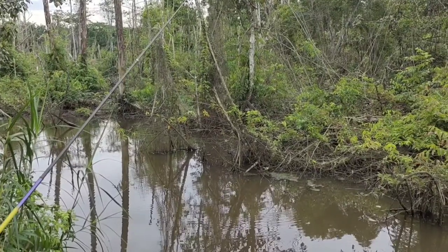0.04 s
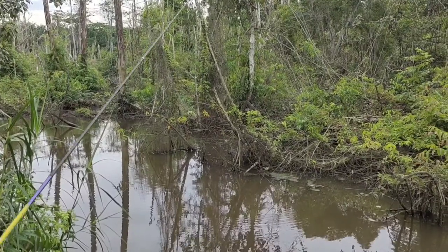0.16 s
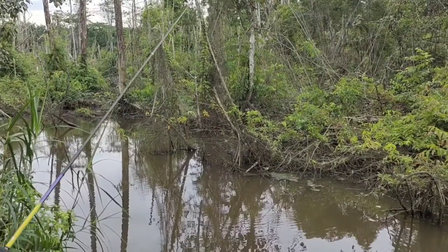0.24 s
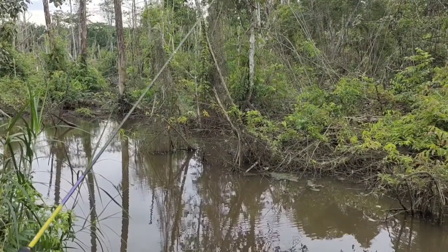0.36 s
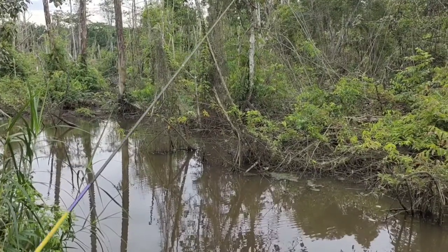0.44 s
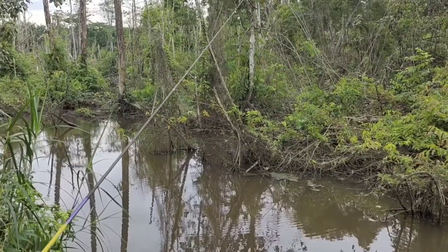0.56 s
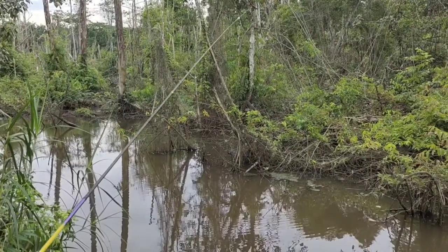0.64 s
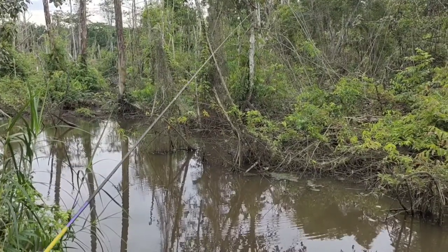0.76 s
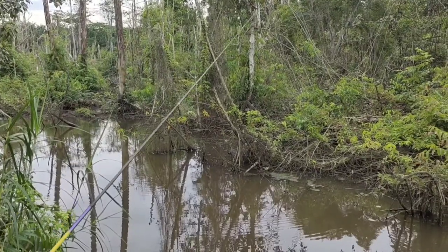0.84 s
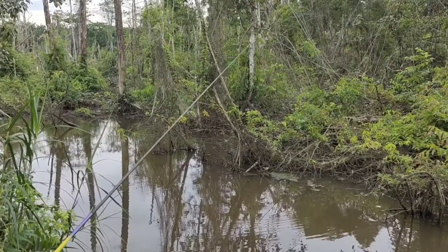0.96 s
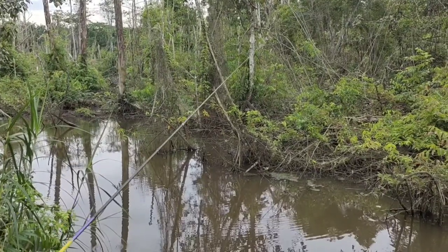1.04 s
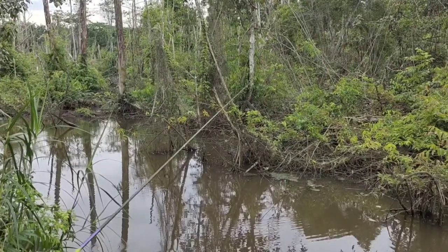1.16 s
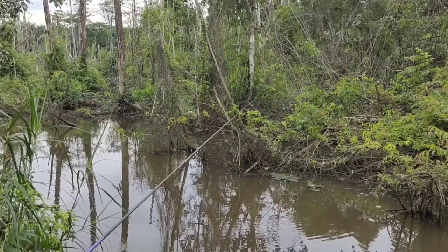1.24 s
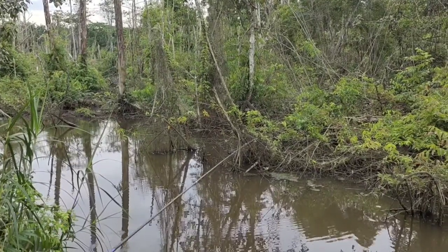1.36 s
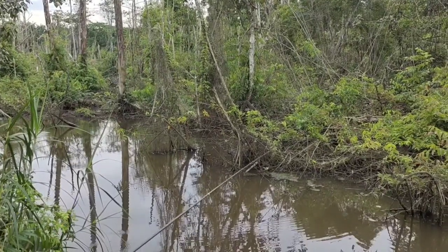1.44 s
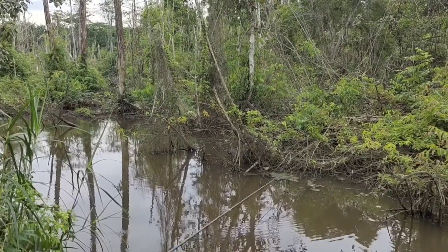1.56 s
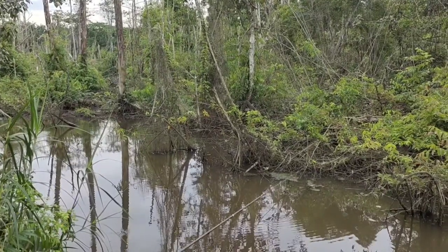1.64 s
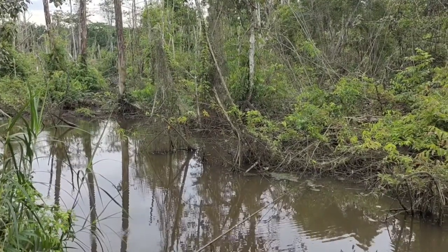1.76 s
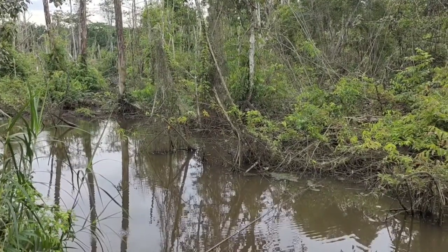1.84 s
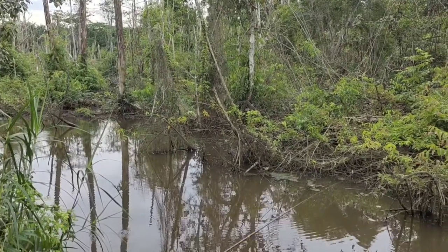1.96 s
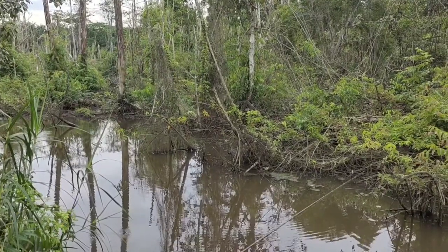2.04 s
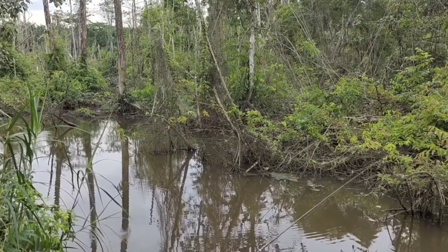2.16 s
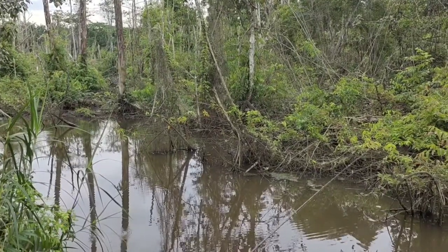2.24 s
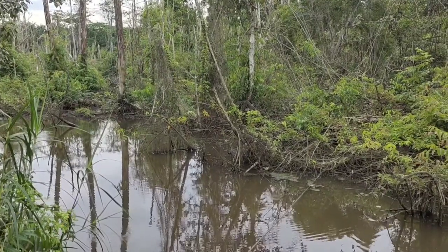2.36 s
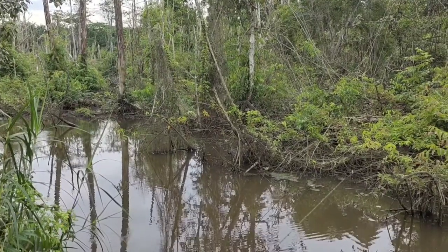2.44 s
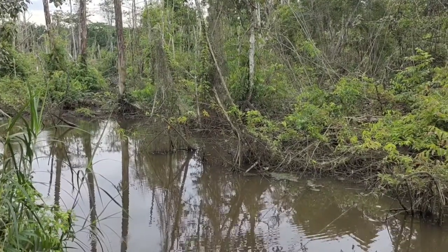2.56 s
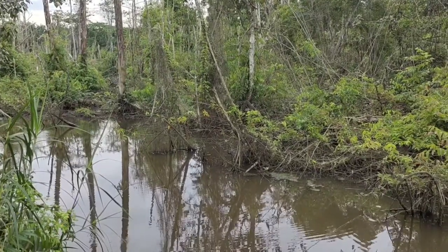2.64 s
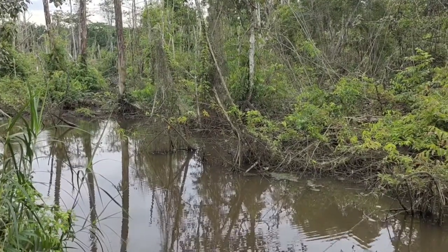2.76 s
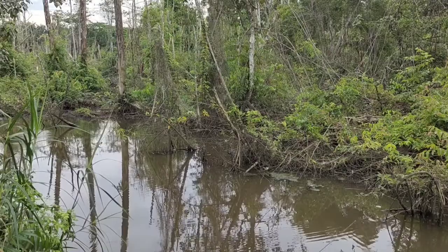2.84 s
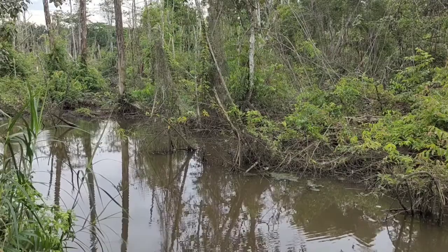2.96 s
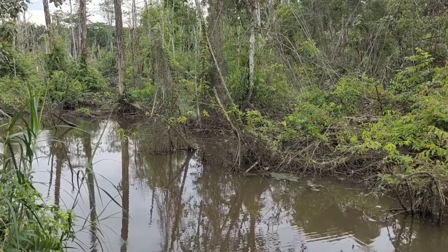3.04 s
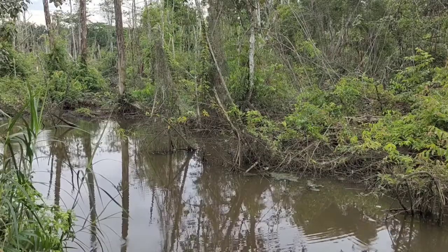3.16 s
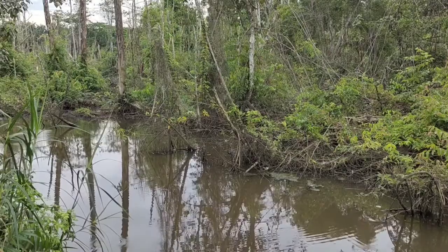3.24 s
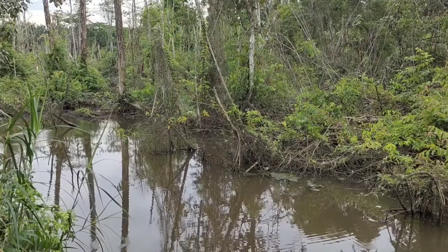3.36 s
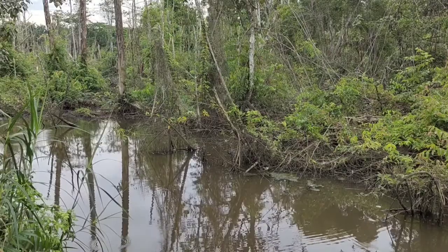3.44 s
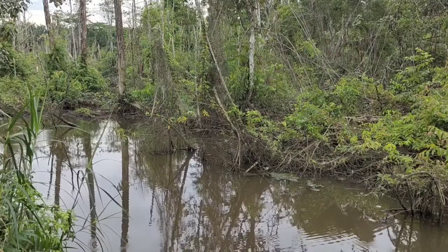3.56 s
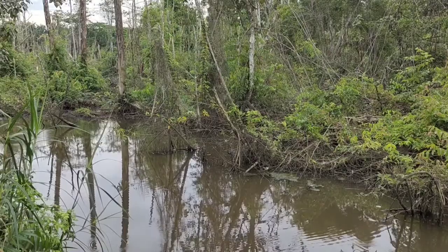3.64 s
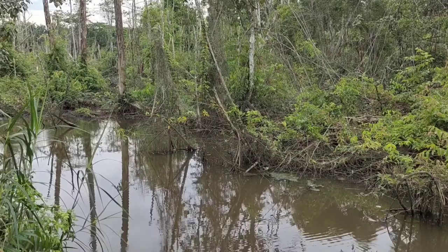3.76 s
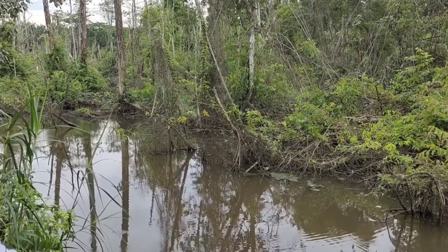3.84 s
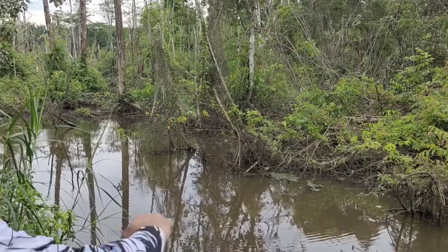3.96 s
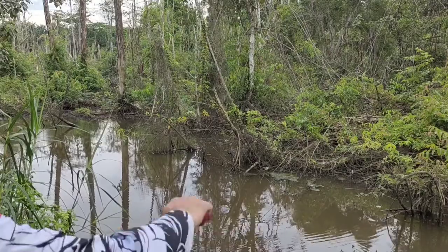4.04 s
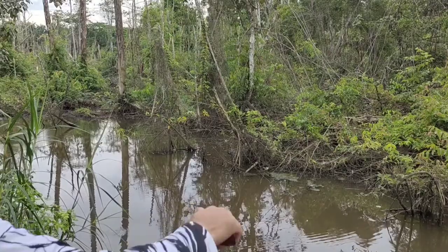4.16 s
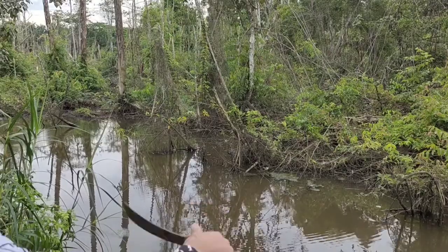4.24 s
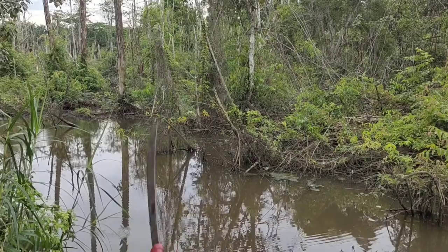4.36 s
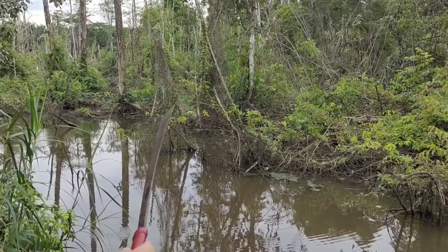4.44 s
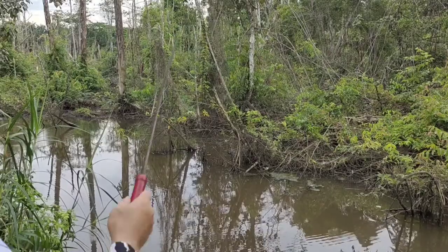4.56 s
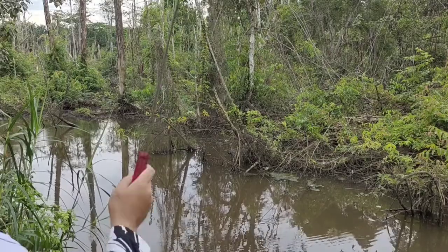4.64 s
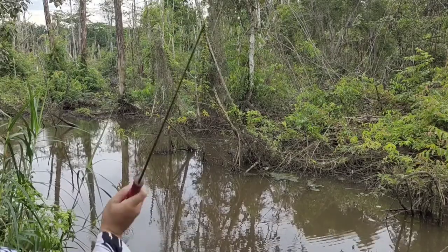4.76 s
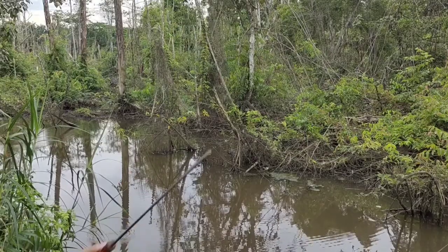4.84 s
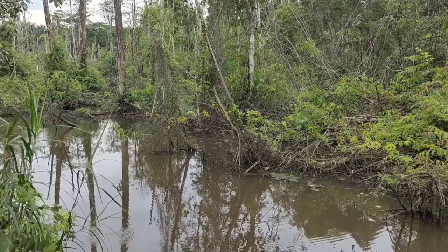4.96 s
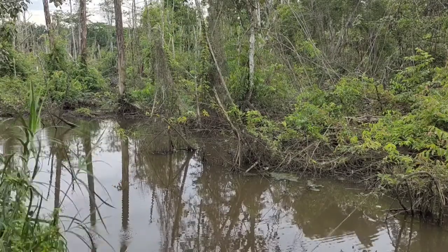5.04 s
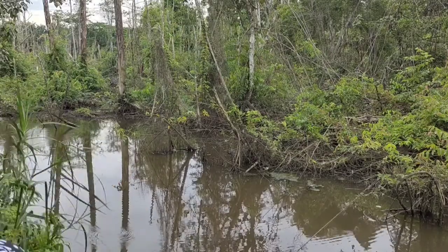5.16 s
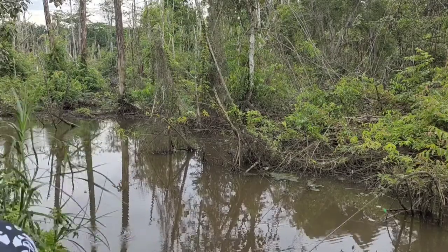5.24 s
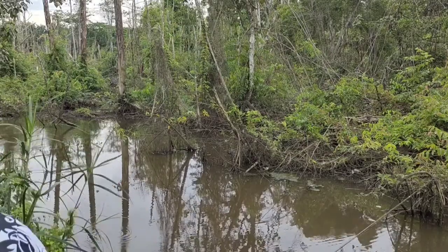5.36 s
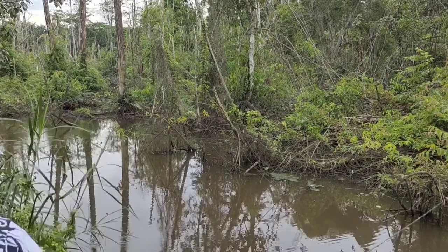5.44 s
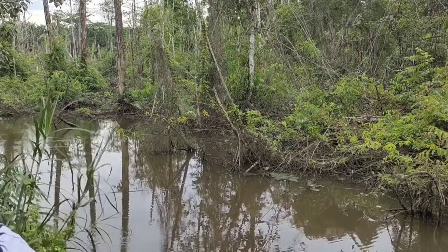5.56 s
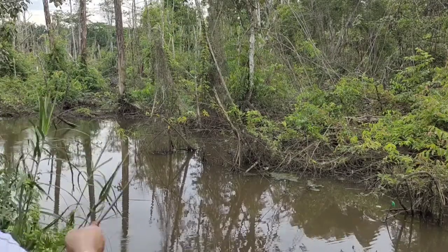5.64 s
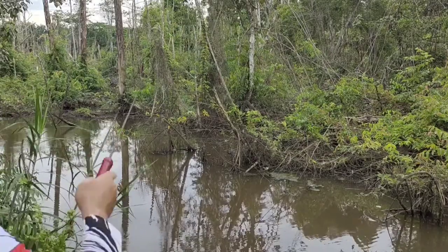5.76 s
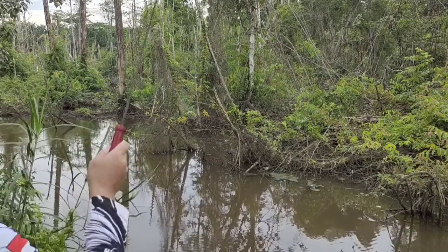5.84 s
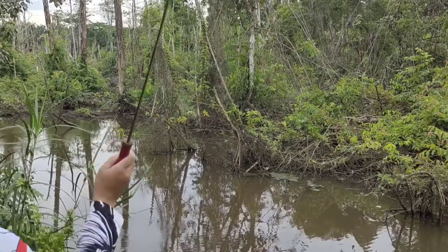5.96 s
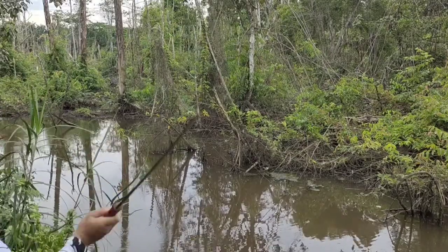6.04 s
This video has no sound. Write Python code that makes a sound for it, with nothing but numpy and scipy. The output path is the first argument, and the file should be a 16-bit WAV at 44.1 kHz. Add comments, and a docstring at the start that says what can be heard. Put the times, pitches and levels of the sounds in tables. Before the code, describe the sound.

Cicadas throb steadily at a still swamp pool, with faint bird chirps and a barely audible distant engine. Close to the microphone, a fishing rod knocks and its grip rustles, followed by light taps and a sleeve swish. Near the end the rod tip slaps the water with a loud splash and gulp, drops patter back, and the rod gives its sharpest knock.

```python
"""A fishing rod knocks and its grip rustles close by, over the throb of cicadas at a still swamp pool.
Small birds chirp from the trees and an engine drones far away. Each knock rings the modes of the rod,
and a sleeve swishes by stick-slip friction. Near five seconds the rod tip is slapped into the water:
a sheet of spray flies up, trapped air gulps, and drops patter back as tiny ringing bubbles.
The loudest knock of the rod follows a second later."""
import sys
import numpy as np
from scipy import signal
from scipy.fft import rfft, irfft, next_fast_len
from scipy.io import wavfile

SR = 44100
rng = np.random.default_rng(int(sys.argv[2]) if len(sys.argv) > 2 else 0)


def store_pcm(level_fs):
    """Save levels as 16-bit WAV."""
    pcm = np.round(np.clip(level_fs, -1, 1) * 32767).astype(np.int16)
    wavfile.write(sys.argv[1], SR, np.atleast_2d(pcm).T)


N = 268833
TIME = np.arange(N) / SR
FREQS = np.fft.rfftfreq(N, 1 / SR)
SIDES = np.array([[1], [-1]])  # left, right


def undb(db):
    """Amplitude ratio of a level in decibels."""
    return 10 ** (np.asarray(db) / 20)


def unit(x):
    """Normalisation to an rms of 1."""
    return x / np.sqrt(np.mean(x ** 2))


def curve(rows, axis=1):
    """Linear interpolation in time of one column of a table."""
    rows = np.array(rows)
    return np.interp(TIME, rows[:, 0], rows[:, axis])


def gains(points):
    """Frequency response through (Hz, dB) points, interpolated in log frequency."""
    hz, db = np.transpose(points)
    return undb(np.interp(np.log(FREQS + 1), np.log(hz), db))


def shape(x, gain):
    """Zero-phase filtering: the spectrum is multiplied by a frequency response."""
    size = next_fast_len(N, True)
    response = np.interp(np.fft.rfftfreq(size, 1 / SR), FREQS, gain)
    return irfft(rfft(x, size) * response, size)[..., :N]


def walk(rate, size=N):
    """Low-pass noise of spread near 1: `rate` random values a second, joined by straight lines."""
    steps = np.arange(size) / SR * rate
    return np.interp(steps, np.arange(size), rng.standard_normal(size))


def grains(rate, scatter_db, channels=3):
    """Shot noise: independent streams of uneven clicks, on average `rate` a second."""
    size = (channels, N)
    hit = rng.random(size) < rate / SR
    clicks = hit * rng.standard_normal(size)
    return unit(clicks * undb(scatter_db * np.minimum(rng.exponential(size=size), 4)))


def add(out, s, sound):
    """Superposition of a sound that starts at s seconds."""
    i = int(s * SR)
    part = sound[..., :N - i]
    out[:, i:i + part.shape[-1]] += part


def fade(t, t60):
    """Exponential decay by 60 dB in t60 seconds."""
    return np.exp(-np.log(1000) * t / t60)


def envelope(start, attack, hold, t60):
    """A transient's linear rise, plateau and exponential decay."""
    age = TIME - start
    return np.clip(age / attack, 0, 1) * fade(np.maximum(age - attack - hold, 0), t60)


def pan(db):
    """Direction by level difference: two gains, the left `db` above the right."""
    return undb(SIDES * db / 2)


def arrival(x, left_leads_ms):
    """Direction by time difference: sound from one side reaches one microphone first."""
    return np.array([x, np.roll(x, round(left_leads_ms * SR / 1000))])


def spread(streams, direct, left_leads_ms):
    """Two streams form a diffuse field, coherent in the bass; a third arrives directly."""
    # Width of the diffuse field. Each row: frequency in Hz, side minus mid in dB.
    width = [(100, -14), (250, -6), (600, -1.5), (1300, 2.5), (3000, -1), (15000, 0.5)]
    side = gains(width)
    norm = 1 / np.sqrt(1 + side ** 2)
    diffuse = shape(streams[0], norm) + SIDES * shape(streams[1], side * norm)
    return unit(diffuse + direct * arrival(streams[2], left_leads_ms))


def forest(x, wet_db, t60):
    """Reverberation: trunks and leaves scatter a thin, diffuse echo."""
    t = TIME[:SR]
    echo = rng.standard_normal((2, SR)) * fade(t, t60) * (1 - np.exp(-t / 0.001))
    echo /= np.sqrt(np.sum(echo ** 2) / 2)
    return x + undb(wet_db) * signal.fftconvolve(x, echo, axes=1)[:, :N]


def forest_air(level_db=-57.5):
    """Ambient noise: a soft, mostly diffuse wash."""
    # Spectrum of the air. Each row: frequency in Hz, relative level in dB.
    colour = [(25, -10), (48, -10), (70, -6), (125, 6), (190, -3.5), (260, -7.5), (600, -12.5),
              (1600, -17.5), (3900, -16.5), (5300, -19.5), (8200, -16), (10500, -29.5), (13500, -23),
              (15400, -22)]
    air = spread(shape(rng.standard_normal((3, N)), gains(colour)), direct=0.42, left_leads_ms=0.36)
    return air * undb(level_db + 0.18 * walk(7.4))


def far_engine(hum_hz=191, hum_db=-67):
    """Periodic firing gives a tone that follows the engine's speed, beside a nearly steady hum."""
    # Course of the engine. Each row: time in seconds, firing rate in Hz, level in dB.
    running = [(0, 78, -64), (.45, 76.7, -59.5), (.8, 83, -59.5), (1.4, 89, -66.5), (2.25, 79, -64.5),
               (2.65, 68, -67), (6.1, 69, -70)]
    firing_phase = 2 * np.pi * np.cumsum(curve(running) * (1 + 0.0198 * walk(13))) / SR
    drone = np.sin(firing_phase) * undb(curve(running, axis=2) + 2 * walk(4.38))
    hum_phase = 2 * np.pi * np.cumsum(hum_hz + 1.53 * walk(17)) / SR
    hum = np.sin(hum_phase) * undb(hum_db + 1.34 * walk(2.28))
    return np.sqrt(2) * (drone + hum)


def buzz(hz, width_hz, db, pan_db):
    """Forced resonance: dense tymbal clicks drive one mode of an insect's body."""
    body = 1 / (1 + (2 * (FREQS - hz) / width_hz) ** 2)
    return unit(shape(grains(rate=2700, scatter_db=0.5, channels=2), body)) * undb(db) * pan(pan_db)


def insects(throb_hz=11.5, throb_wander=0.038, throb_db=1.5, swell_db=2.5, far_rise_db=3):
    """Amplitude modulation: near cicadas throb together; far insects waver and slowly build."""
    # Body resonances. Each row: frequency in Hz, width in Hz, level in dB, left minus right in dB.
    cicadas = [(7314, 14, -61, 3), (7246, 410, -59, -0.5), (7515, 390, -57, 6)]
    far_insects = [(6220, 50, -75, 6), (6710, 160, -72, 5), (9080, 970, -64.5, 7)]
    throb_phase = 2 * np.pi * np.cumsum(throb_hz * (1 + throb_wander * walk(2.01))) / SR
    near = sum(buzz(*row) for row in cicadas) * undb(throb_db * np.sin(throb_phase) + 0.5 * walk(2.6))
    far = sum(buzz(*row) * undb(swell_db * walk(8.8)) for row in far_insects)
    return near + far * undb(far_rise_db * (TIME / TIME[-1] - 1))


def syrinx(length, hz, glide_hz, rough, octave_db, twelfth_db=-60, flutter_db=5.5):
    """Two oscillators: one side of the syrinx glides and rasps, the other holds the octave above."""
    size = int(length * SR)
    progress = np.linspace(0, 1, size)
    jitter = 0.11 * rough * walk(1400, size=8192)[:size]
    flutter = walk(228, size=8192)[:size]
    lower_phase = 2 * np.pi * np.cumsum((hz + glide_hz * (progress - 0.5)) * (1 + jitter)) / SR
    upper_phase = 2 * np.pi * np.cumsum(2 * hz * (1 + 0.43 * jitter)) / SR
    overtones = undb(octave_db) * np.sin(upper_phase) + undb(twelfth_db) * np.sin(3 * lower_phase)
    arch = (4 * progress * (1 - progress)) ** 0.092
    return (np.sin(lower_phase) + overtones) * arch * undb(flutter_db * rough * flutter)


def birds(chip_rise_hz_per_s=6400):
    """Frequency-modulated tones from trees to the left: hoarse calls, thin pips, bright rising chips."""
    # Hoarse calls. Each row: start and length in seconds, pitch and glide in Hz, level in dB.
    rasps = [(0.827, .11, 2074, 0, -60.5), (1.337, 0.096, 2204, -300, -56.5),
             (1.614, 0.092, 2174, 130, -54), (1.909, 0.047, 2154, 142, -55), (2.11, .063, 2153, 32, -54.5),
             (3.103, 0.023, 2294, -350, -57), (3.238, 0.02, 2240, -260, -57.5),
             (3.427, 0.049, 2210, -260, -58.5), (3.785, 0.08, 2175, -78, -57.5),
             (3.926, 0.078, 2138, -100, -56.5)]
    # Short notes. Each row: start and length in seconds, pitch in Hz, level in dB.
    pips = [(.737, 0.029, 3450, -58), (.74, .08, 4360, -55.5), (.814, .027, 5360, -56),
            (0.911, 0.022, 3875, -52), (1.323, 0.13, 5360, -62.5), (1.536, 0.031, 3920, -63),
            (1.913, .016, 3390, -60), (2.112, 0.018, 3390, -59), (3.62, 0.013, 4065, -49),
            (3.704, .022, 3360, -51), (3.776, .022, 4070, -50), (3.939, 0.01, 4015, -45),
            (5.437, .019, 3110, -52)]
    chips = [(0.546, .017, 4380, -53.5), (0.984, .018, 4330, -54), (2.848, 0.012, 4090, -58),
             (2.927, .049, 4003, -54), (6.046, 0.017, 4120, -57)]
    song = np.zeros((1, N))
    for s, length, hz, glide_hz, db in rasps:
        add(song, s, undb(db) * syrinx(length, hz, glide_hz, rough=0.68, octave_db=-6))
    for s, length, hz, db in pips:
        add(song, s, undb(db) * syrinx(length, hz, glide_hz=0, rough=0.3, octave_db=-24))
    for s, length, hz, db in chips:
        glide_hz = chip_rise_hz_per_s * length
        add(song, s, undb(db) * syrinx(length, hz, glide_hz, rough=0.34, octave_db=1.5, twelfth_db=-5))
    return forest(arrival(song[0], left_leads_ms=0.38) * pan(3.6), wet_db=-0.5, t60=0.16)


def handling(rise_share=0.6, fall_db=18.5, resting_db=-72.5):
    """Incoherent sounds add in power: the envelope of hand moves that swell fast and fade more slowly."""
    # Shifts of grip among the reeds. Each row: peak time and fall time in seconds, level in dB.
    moves = [(.09, 0.39, -49.5), (.3, 0.23, -51.5), (.56, 0.38, -58.5), (1.02, .18, -52.5),
             (1.26, 0.4, -60), (2.68, 0.36, -62.5), (3.25, 0.55, -60), (4.1, 0.66, -65), (4.82, 0.3, -54),
             (5.3, 0.24, -50), (5.6, 0.21, -45.5), (5.99, 0.11, -50)]
    power = undb(resting_db) ** 2
    for s, fall_s, db in moves:
        age = (TIME - s) / fall_s
        power = power + undb(db - fall_db * np.maximum(age, -age / rise_share)) ** 2
    return np.sqrt(power)


def rustle(stem_db=-4):
    """Friction noise: the grip crackles densely and stems add sparser ticks."""
    # Spectrum of the rustle. Each row: frequency in Hz, relative level in dB.
    colour = [(150, -27), (400, 2.5), (900, -2), (2500, -1), (4100, -0.5), (5600, -8.5), (8500, -0.5),
              (12800, -8.5), (15200, -5.5)]
    grip = spread(shape(grains(rate=7100, scatter_db=0), gains(colour)), direct=0.8, left_leads_ms=-0.1)
    stems = spread(shape(grains(rate=120, scatter_db=3), gains(colour)), direct=1, left_leads_ms=-0.1)
    return (grip + undb(stem_db) * stems) * handling()


def sleeve(start_s=3.47, length_s=0.46, level_db=-45.5, catch_db=3, pitch_sag=0.15):
    """Stick-slip friction: cloth fibres crackle, louder and lower the faster the arm reaches out."""
    # Spectrum of the cloth. Each row: frequency in Hz, relative level in dB.
    colour = [(150, -40.5), (400, -16), (780, -3.5), (1450, -5), (2030, -2), (2300, -2), (2850, -2),
              (4100, -7), (5800, -12), (8500, -8), (12800, -12.5), (15200, -15)]
    # Resonances of the swish. Each row: frequency at rest in Hz, width in Hz, relative level in dB.
    resonances = [(880, 170, -15.5), (2240, 140, -7.5), (3130, 320, -12.5)]
    speed = np.abs(np.sin(np.pi * np.clip((TIME - start_s) / length_s, 0, 1)))  # one stroke, 0-1
    fibres = shape(grains(rate=8700, scatter_db=-1), gains(colour))
    cloth = spread(fibres, direct=0.75, left_leads_ms=-0.32)
    phase_per_hz = 2 * np.pi * np.cumsum(1 - pitch_sag * speed ** 2) / SR
    rings = sum(undb(db) * unit(walk(width) * np.sin(hz * phase_per_hz)) for hz, width, db in resonances)
    swish = cloth + arrival(rings, left_leads_ms=-0.34)
    return swish * speed ** 0.54 * undb(level_db + catch_db * walk(60))


def finger_taps(count=6, level_db=-49, scatter_db=2, blow_hz=750, crack_db=-6):
    """Weak impacts at random moments and places along the rod, as rows for knocks()."""
    return [(when * TIME[-1], level_db + scatter_db * (2 * force - 1), blow_hz,
             0.094 + 0.29 * place, crack_db) for when, force, place in rng.random((count, 3))]


def rod_ring(t, blow_hz, place, focus=1.76, contact_s=0.00037):
    """Modal vibration: a mode rings most if near the blow's frequency and struck away from its nodes."""
    # Modes of rod and grip. Each row: frequency in Hz, relative level in dB, t60 in seconds.
    modes = [(403, 5.5, 0.014), (804, 9, 0.01), (1115, 11.5, 0.0084), (1580, 11, 0.0084),
             (2125, 12.5, 0.012), (2650, 21, 0.033), (3300, 9, 0.017)]
    ring = 0
    for order, (hz, db, t60) in enumerate(modes, start=1):
        coupling = np.sin(order * np.pi * place) * np.exp(-focus * np.log(hz / blow_hz) ** 2)
        ring = ring + coupling * undb(db) * np.sin(2 * np.pi * hz * t) * fade(t, t60)
    ring = ring * (1 - np.exp(-t / contact_s))
    return ring / np.abs(ring).max()


def knocks(crack_t60=0.015, crack_trim_db=-9):
    """Impact excitation: each blow gives a broadband crack and a brief hollow ring of the rod."""
    # Blows on the rod. Each row: start in seconds, level in dB, centre frequency in Hz,
    # place along the rod from 0 to 1, relative level of the crack in dB.
    blows = [(.0746, -24.5, 613, 0.47, 1), (.532, -43, 700, .01, -2), (1.783, -39, 300, 0.4, -18),
             (1.793, -40.5, 478, 0.24, 0), (2.36, -48.5, 900, 0.33, -8), (2.5272, -45, 1420, .33, 6.5),
             (2.853, -48.5, 725, .36, -1.5), (3.5818, -37, 500, 0.7, -6), (4.6188, -29, 940, .32, -0.5),
             (4.795, -41, 885, 0.22, -0.5), (5.8306, -15.5, 1341, 1 / 3, -4.5),
             (5.844, -35, 950, 0.49, -11), (5.969, -39, 604, 0.26, -20), (5.995, -40.5, 760, 0.25, -17)]
    # Spectral weights of ring (a thin rod radiates little bass) and crack.
    # Each row: frequency in Hz, gain in dB.
    radiation = [(80, -27), (350, 2)]
    crack_colour = [(300, 11), (1500, 0), (3300, 8), (5500, 3), (9000, 12.5), (15000, 10)]
    rings, cracks = np.zeros((2, N)), np.zeros((2, N))
    t = TIME[:4096]
    for s, db, blow_hz, place, crack_db in blows + finger_taps():
        add(rings, s, arrival(rod_ring(t, blow_hz, place), left_leads_ms=-0.11) * undb(db))
        crack = rng.standard_normal((2, len(t))) * fade(t, crack_t60)
        add(cracks, s, crack * undb(db + crack_db + crack_trim_db))
    rings = forest(shape(rings, gains(radiation)), wet_db=-14.5, t60=0.2)
    cracks = forest(shape(cracks, gains(crack_colour)), wet_db=-3.5, t60=0.21)
    return (rings + cracks) * pan(-0.6)


def bubble(hz, cycles, glide=0.092):
    """Bubble resonance: a pocket of air rings, rising in pitch as it nears the surface."""
    life = cycles / hz
    t = TIME[:int(life * SR) + 2]
    phase = 2 * np.pi * hz * t * (1 + glide * t / life / 2)
    onset = 1 - np.exp(-2 * t * hz)
    return np.sin(phase) * fade(t, life * 1.8) * onset * (1 - t / t[-1])


def patter(start_s, low_hz=520, high_hz=9000, scatter_db=4, level_db=-50, halving_s=0.25):
    """Air entrainment: falling drops ring as tiny bubbles, ever fainter with time."""
    drops = np.zeros((2, N))
    for when, pitch, size, place in rng.random(size=(1000, 4)):
        hz = low_hz * (high_hz / low_hz) ** pitch
        drop = bubble(hz, cycles=6) * undb(-scatter_db * np.log(size + 0.027))
        add(drops, start_s + when * (TIME[-1] - start_s), drop * pan(12 * (place - 0.5)))
    drops /= np.std(drops[:, int(start_s * SR):])
    return drops * undb(level_db) / (1 + np.maximum(TIME - start_s, 0) / halving_s)


def water_slap(slap_s=4.9088, drop_delay_s=0.04):
    """Water entry: the rod tip tears the surface into spray, the cavity gulps shut, drops fall back."""
    # Four stages: the tip smacks, a sheet rises, it breaks into spray, the pool sloshes.
    # Each row: delay, attack, hold and t60 in seconds, level in dB.
    stages = [(0, 0.0025, 0.0019, 0.0093, -20), (.0065, 0.0027, 0.033, 0.24, -20.5),
              (.01, .04, .01, 0.83, -31), (0.022, 0.13, 0.15, 6.3, -47)]
    # Spectrum of the spray. Each row: frequency in Hz, relative level in dB.
    colour = [(90, -19), (200, -3), (450, -1), (800, -3), (1300, -4), (2000, -1.5), (2900, 0.5),
              (4200, -2.5), (6000, -7), (8200, -3), (10000, -4), (13000, -7), (15200, -7)]
    # Air pockets, most of them behind the rod tip.
    # Each row: start in seconds, pitch in Hz, level in dB, length in cycles.
    gulps = [(3.126, 1253, -45, 66), (4.918, 152.4, -31, 10), (4.928, 241, -29, 12), (4.938, 330, -21, 9.1),
             (4.945, 1953, -20, 72), (4.946, 503, -29, 48), (4.956, 88, -34.5, 7.7),
             (4.964, 170.2, -23.5, 4.1), (5.015, 250, -32, 6.6), (5.073, 775, -37, 18)]
    spray = spread(shape(grains(rate=22000, scatter_db=0), gains(colour)), direct=0.7, left_leads_ms=-0.14)
    flicker = undb(walk(250))
    power = sum((undb(db) * envelope(slap_s + delay, attack, hold, t60)) ** 2
                for delay, attack, hold, t60, db in stages)
    splash = spray * flicker * np.sqrt(power)
    for s, hz, db, cycles in gulps:
        add(splash, s, undb(db) * bubble(hz, cycles))
    return forest(splash + patter(slap_s + drop_delay_s), wet_db=-17, t60=0.5)


def scene():
    """Superposition of everything heard from the bank."""
    return insects() + birds() + knocks() + rustle() + sleeve() + water_slap() + far_engine() + forest_air()


def record(dry, bass_hz=55, top_hz=15500):
    """Band limiting: the recorder cuts deep bass and top, and each microphone port colours its channel."""
    # Imbalance of the two ports. Each row: frequency in Hz, left minus right in dB.
    ports = [(1000, 0), (4300, 1), (5800, 1), (7200, 2), (8600, -9), (10800, 1), (12500, -0.5), (15000, 5)]
    thinned = signal.sosfilt(signal.butter(3, bass_hz, "highpass", fs=SR, output="sos"), dry)
    left = shape(thinned[0], gains(ports) ** 0.5)
    right = shape(thinned[1], gains(ports) ** -0.5)
    return signal.sosfilt(signal.ellip(10, 0.2, 80, top_hz, fs=SR, output="sos"), [left, right])


dry = scene()
out = record(dry)
store_pcm(out)
```